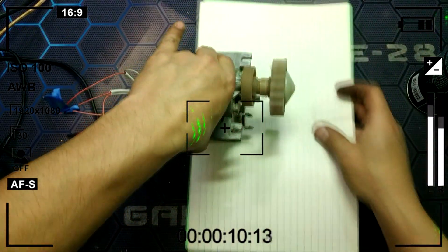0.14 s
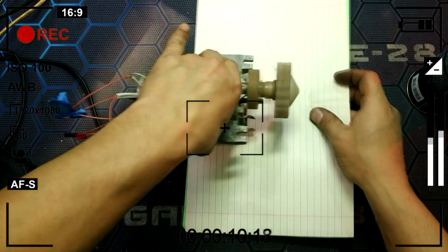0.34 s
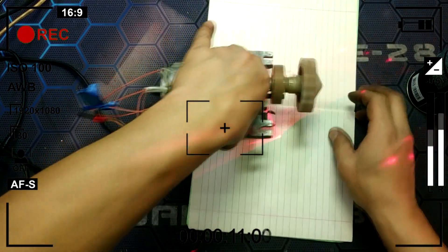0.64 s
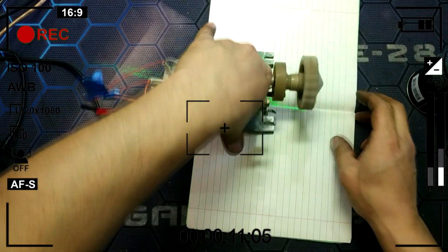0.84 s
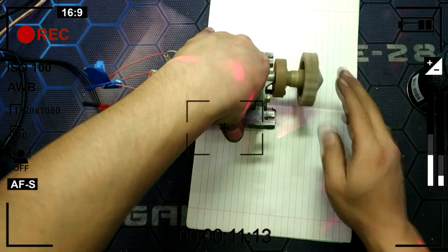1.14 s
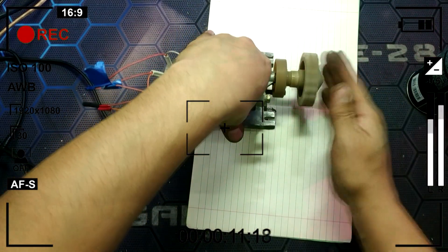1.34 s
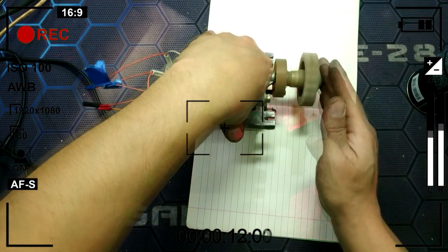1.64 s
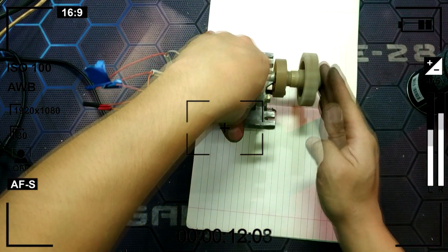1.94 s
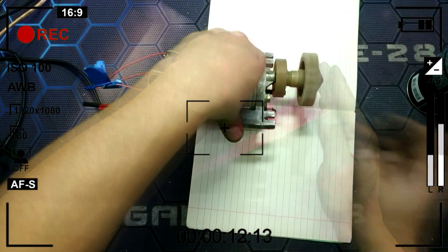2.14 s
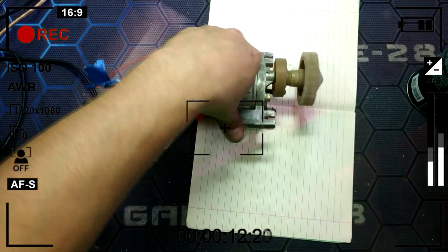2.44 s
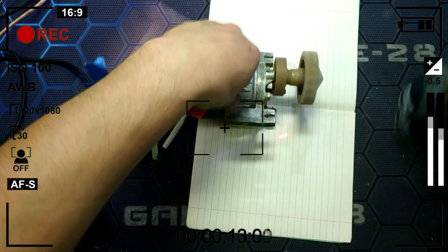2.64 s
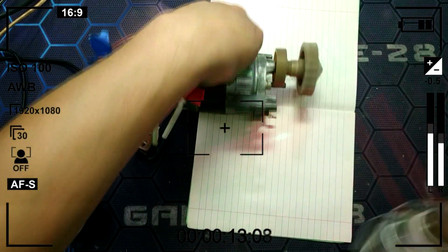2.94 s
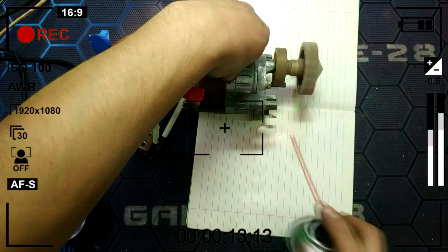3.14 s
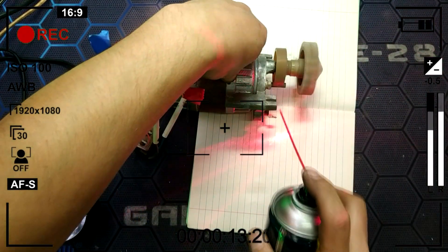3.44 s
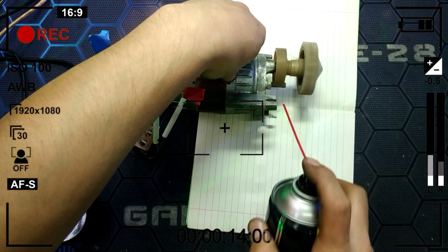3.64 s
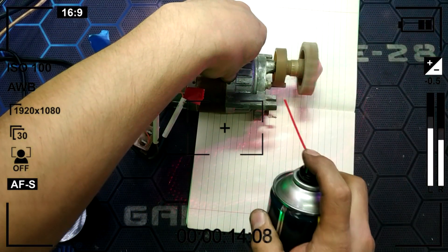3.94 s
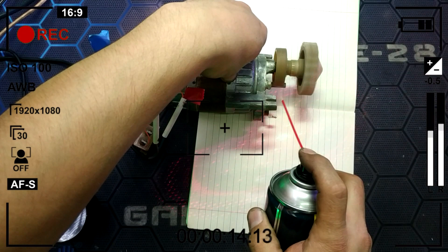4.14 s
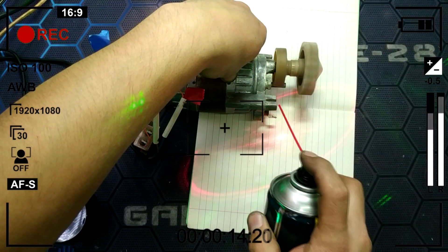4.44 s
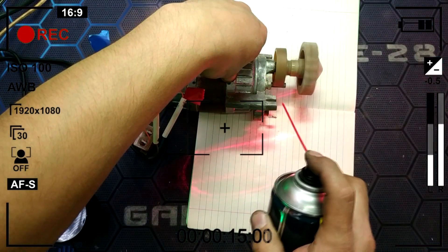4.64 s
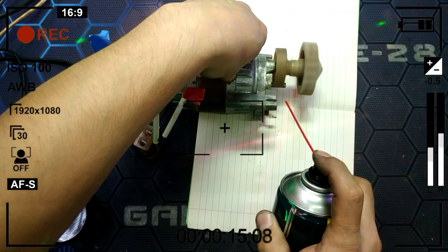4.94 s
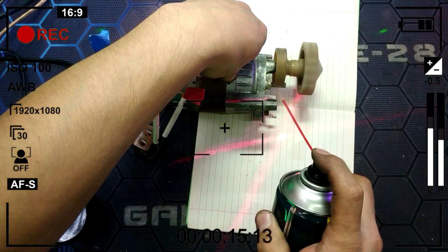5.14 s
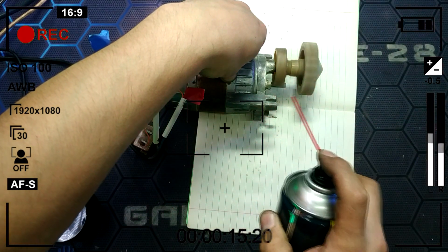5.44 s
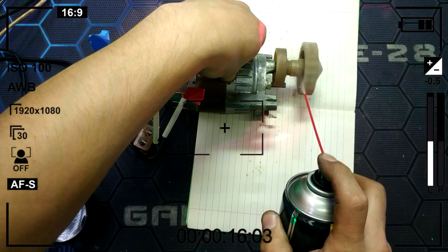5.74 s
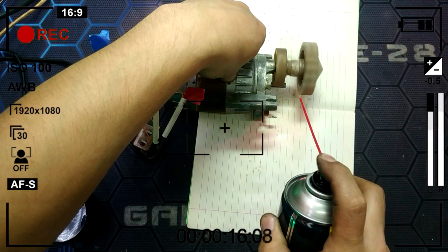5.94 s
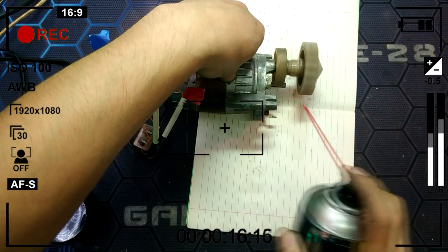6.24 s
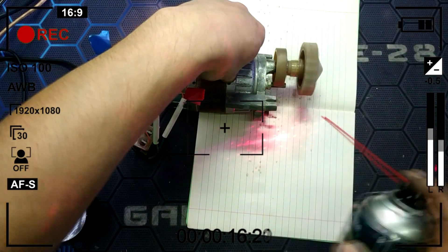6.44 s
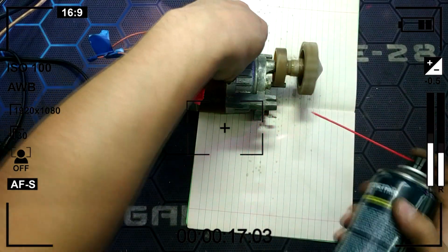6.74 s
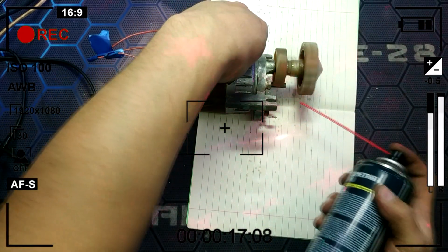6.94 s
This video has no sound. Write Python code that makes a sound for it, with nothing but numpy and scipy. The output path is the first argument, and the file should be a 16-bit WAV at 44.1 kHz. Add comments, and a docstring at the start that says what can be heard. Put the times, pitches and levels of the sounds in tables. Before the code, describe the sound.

Gritty, fast-throbbing metal grinding from a little motor, dropping to faint whine and light grazes once, then returning almost steadily to the end.

```python
"""On a desk top in a room: a small electric motor, held down on a notepad, turns a knob on a dry shaft.
About ten turns a second grind in the metal casing: random grit rings resonances, its force set over time.
The grind falters and drops out, baring light grazes, a thin whine, faint singing notes and filtered hiss.
The desk rumbles along as noise in low resonances and is knocked twice, as decaying sines.
One microphone without bass; distance lies in the levels alone, and both channels are the same."""
import sys
import numpy as np
from scipy import signal
from scipy.fft import rfft, irfft
from scipy.io import wavfile

SR = 44100
rng = np.random.default_rng(int(sys.argv[2]) if len(sys.argv) > 2 else 0)


def store_pcm(level_fs):
    """Save levels as 16-bit WAV."""
    pcm = np.round(np.clip(level_fs, -1, 1) * 32767).astype(np.int16)
    wavfile.write(sys.argv[1], SR, np.atleast_2d(pcm).T)


N = 312228

# Grind in full contact: t/s, level/dB, share of the dull part/dB, share of the top/dB
GRIND = [(0, -22, -0.5, 1.5), (.5, -21, -1.5, 0.5), (1.1, -22.5, -0.5, 2.5), (1.4, -23.5, -1, -2),
         (2.0, -28.5, 3, -11), (2.07, -23.5, -1.5, 1.5), (2.15, -23.5, -1, 0), (2.3, -22.5, 0, 0.5),
         (2.9, -22.5, -1.5, -1), (3.8, -22, -1, -2.5), (4.3, -22.5, 0, 1), (4.8, -22, -0.5, -1),
         (5.7, -21.5, -1, -2), (6.5, -22, -0.5, -1.5), (6.8, -22.5, 0, -0.5), (7.08, -23, 1, -1.5)]
# The grind slackens (negative depth: it bears harder): t/s, depth/dB, length/s
FALTERS = [(.473, 2.5, 0.066), (.686, 5.5, 0.014), (1.3, -1, .02), (2.223, 1.5, 0.033), (2.66, 1.5, 0.056),
           (3.253, 2, 0.038), (3.475, 3, 0.027), (3.67, 1.5, 0.038), (3.828, 6, 0.068), (4.005, 2, 0.063),
           (4.099, 4, 0.071), (4.146, 1.5, .03), (4.285, 0.5, 0.023), (4.598, 1.5, 0.12),
           (5.118, 2.5, 0.055), (5.317, 2.5, 0.031), (5.46, 5.5, 0.039), (5.532, 1.5, 0.054),
           (5.94, 1, 0.031), (6.432, 1.5, .057), (6.746, 4.5, 0.033), (7.02, 1.5, 0.024)]
# Contact is lost: lets go t/s, bites again t/s, first drop/dB, fade/(dB/s), return/(dB/s), weaker on return/dB
DROPOUTS = [(1.414, 2.011, 4, 350, 1800, 2.5), (4.2, 4.262, 5.5, 225, 3000, 3.5),
            (6.826, 6.975, 2.5, 310, 520, 1.5)]
# The free shaft grazes about once a turn:
# t/s, level/dB, rise time of 10 dB/s, fade/(dB/s), share of the dull part/dB
GRAZES = [(1.505, -40, .035, 300, 13), (1.5575, -33, 0.003, 520, 12), (1.577, -36.5, .006, 480, 6),
          (1.672, -43.5, .025, 300, 14), (1.765, -42, .022, 300, 15), (1.858, -49, .025, 260, 16),
          (1.968, -42, .012, 350, 13), (6.927, -46, .012, 500, 5)]
# A light touch rings the casing less: f/Hz, relative level/dB
GRAZE_COLOUR = [(2000, -16), (3000, -3), (4000, -6), (5000, -3), (5350, -3), (5800, -3), (6500, -5),
                (7200, -5), (9000, -7), (15700, -8)]
# Casing resonances: f/Hz, width/Hz, relative level/dB
CASING = [(739, 38, -16.5), (1157, 29, -10.5), (1535, 62, -9), (1766, 63, -14), (2125, 18, -12),
          (2460, 80, -9.5), (2605, 34, -5.5), (2762, 26, -2), (2974, 38, -5), (3332, 37, -3.5),
          (3530, 37, -3.5), (3705, 91, -2), (4404, 79, -2), (4592, 45, 3), (4700, 66, 4.5), (4844, 58, 0),
          (4970, 59, 2.5), (5192, 68, 2.5), (5260, 60, -3), (5340, 72, -1.5), (5480, 58, -6),
          (6320, 270, -11.5), (7430, 220, -8), (8020, 220, -6.5), (8280, 78, -7.5), (9030, 170, -9),
          (10810, 640, -9.5), (11040, 150, -11), (11520, 480, -9.5), (13400, 270, -8), (14100, 120, -10)]
# Broad part of the grind: f/Hz, relative level per Hz/dB
RUB = [(290, -34), (500, -16.5), (828, -15.5), (1280, -15.5), (2600, -8), (3150, -8), (3660, -6.5),
       (4100, -8), (5020, -1), (5970, -5), (8000, -7), (9500, -9.5), (12500, -10), (15700, -12.5)]
# Where the casing radiates badly (one row lifts instead): f/Hz, width/Hz, depth before scaling/dB
VALLEYS = [(1080, 95, -3), (2240, 78, -12), (1650, 71, -6), (3054, 80, -6), (3250, 90, -7), (3870, 36, -5),
           (4100, 110, -6), (4790, 46, -10), (6030, 130, -4.5), (6500, 200, -12.5), (8040, 100, -5),
           (8400, 240, -2), (9400, 150, 1), (9400, 350, -9)]
# A band that the holding hand damps as it presses down: t/s, lift before scaling/dB
LOOSE_LIFT = [(0, 8.5), (1.0, 5), (1.4, 6), (2.1, 2), (4, 0.5), (5.5, 3.5), (7.08, 0.5)]
# The blows on the desk: t/s, strength/dB, lowest mode/dB, upper modes/dB, rise time constant/s
KNOCKS = [(3.151, -21, 0, -9, 0.0024), (3.175, -31, -4, -5, .002), (3.411, -21.5, -5, 2, 0.00049),
          (3.421, -26, -8, 2.5, 0.0013), (3.429, -26, -7, 1, .001), (3.4439, -30, -1, 5, 0.0011)]
# Modes of the knocked desk: f/Hz, relative level/dB, time to fall 60 dB/s
KNOCK_MODES = [(227, 3.5, 0.075), (262, -7, 0.12), (420, -0.5, 0.079), (540, -12, 0.12), (742, -2.5, 0.034),
               (900, -6, 0.025)]
# Desk shaken by the motor: t/s, level/dB, share of the low modes/dB
RUMBLE = [(0, -49.5, -14), (1.0, -51, -3), (1.35, -54, 14.5), (1.6, -43.5, 14.5), (1.75, -29, -10),
          (1.95, -40, 13), (2.03, -48, 5), (2.15, -40.5, -1), (2.35, -44, -8), (2.6, -47, -22),
          (3.1, -37, -8.5), (3.8, -39.5, 0.5), (4.2, -43.5, 8.5), (5.0, -39, -3), (5.5, -38.5, 2),
          (6.3, -40, -11), (6.7, -40.5, 5.5), (6.8, -41, 3.5), (7.08, -48.5, 15.5)]
# Desk resonances: f/Hz, width/Hz, relative level/dB
DESK = [(194, 43, -27), (230, 71, -23.5), (273.7, 27, -7.5), (310, 15.6, -0.5), (356.4, 25.6, 4.5),
        (430.5, 33, 1), (510.5, 19, -4)]
# Upper winding whine: t/s, level/dB
WHINE = [(0, -56.5), (1.5, -49.5), (1.77, -42.5), (1.93, -49.5), (2.09, -44.5), (2.21, -46), (2.34, -56),
         (2.5, -50.5), (4.67, -51), (5.6, -50), (6.58, -54.5), (6.96, -50), (7.08, -51)]
# Pitch of the upper whine: t/s, f/Hz
WHINE_HZ = [(0, 846.7), (1.45, 846.7), (1.6, 845.7), (2.1, 845.8), (2.5, 846.6), (7.08, 846.6)]
# Lower whine: t/s, level/dB
LOWER_WHINE = [(0, -68), (.3, -54), (1.3, -57), (1.5, -54), (1.72, -51), (1.8, -65), (1.95, -59),
               (2.4, -56), (4, -64), (6.6, -57), (6.9, -54), (7.08, -56)]
# Thin notes that linger through the last drop-out: f/Hz, level/dB
SINGING = [(3355, -51), (3585, -57), (3680, -52), (4570, -63)]
# Spectrum of the room and microphone hiss: f/Hz, relative level per Hz/dB
HISS = [(60, -44), (90, -36), (125, -17), (160, -23.5), (188, -5), (225, -12), (350, -13.5), (450, 4.5),
        (560, -7.5), (650, -18), (800, -8), (1000, -12.5), (1400, -5), (2100, -11), (2800, -5),
        (3400, -9.5), (4000, -3), (5000, -14), (5350, -16), (5850, -17), (6400, -12), (7100, -9),
        (8000, -12), (8800, -9.5), (12000, -15), (13200, -15), (15700, -19)]
# The hiss over time: t/s, level/dB
HISS_LEVEL = [(0, -45.5), (1.5, -42.5), (1.8, -42.5), (2.0, -44), (4.2, -43.5), (6.8, -47.5), (7.08, -46)]
# Narrow hollows of the room at the microphone: f/Hz, width/Hz, depth/dB
HOLLOWS = [(244, 17, -8.5), (323, 6.7, -6), (485, 13, -4), (650, 20, -7), (820, 20, -7)]

TURNS_PER_S, FIRST_TURN = 9.72, 0.7   # rate; phase at the start, in turns
SCRAPE_DB = 1.6   # some turns scrape brighter than others
TOP_FOLLOWS = 0.21   # the top loses this share more when contact is weak
LIFTED_DB = -39.5   # what is left of the grind without contact
SETTLE_S, LET_GO_S = 0.032, 0.0017   # time constants: recovery after biting again; the first drop
LOOSE_HZ, LOOSE_WIDTH_HZ = 2290, 270
KNOCK_LOW_HZ = 166   # the blows have little under this
RUMBLE_FOLLOWS = 0.42   # share of the loss of contact that the desk feels
DESK_LAG_S = 0.0077   # the desk follows the contact late, with this time constant
LOWER_WHINE_HZ = 747.0
SING_S, SING_LENGTH_S = 6.87, 0.22   # middle and length of the singing
HISS_FLICKER_DB = 1.3
CUTOFF_HZ = 15710   # top of the microphone's band


def grind(slack, contact):
    """Grit rings the casing; the contact force throbs with each turn, and the top feels it most."""
    level_db, dull_db, top_db = in_time(GRIND)
    turns = FIRST_TURN + TURNS_PER_S * np.arange(N) / SR
    throb = np.cos(2 * np.pi * turns)   # the shaft runs a little off centre
    force_db = slack + 0.39 * throb + 0.36 * drift(2.35) + 0.34 * drift(100)
    scrape_db = SCRAPE_DB * np.maximum(throb, 0) * np.abs(drift(4.1))

    ringing = resonate(grit(per_s=18000, spread_db=0.2), CASING, waver_db=2.35)
    rubbing = coloured(grit(per_s=20000, spread_db=0.24), RUB)
    body = radiate(from_db(-1.5) * ringing + rubbing)
    low = lowpass_both_ways(body, 2, 2300)
    under_top = lowpass_both_ways(body, 2, 8500)

    full = from_db(level_db + contact)
    light, light_dull = grazes()
    low_gain = (full * from_db(dull_db) + light_dull) * from_db(0.56 * drift(28))
    middle_gain = full * from_db(0.66 * drift(19))
    top_share = from_db(top_db + TOP_FOLLOWS * contact)
    top_force = from_db(0.66 * force_db + 0.33 * throb + scrape_db + 1.0 * drift(24))
    top_gain = full * top_share * top_force

    dull = low_gain * low
    middle = middle_gain * (under_top - low)
    top = top_gain * (body - under_top)
    touch = light * coloured(body - low, GRAZE_COLOUR)
    return from_db(force_db) * (dull + middle + top + touch)


def slack_db():
    """Each falter is a hollow in the contact force; a negative depth is a swell."""
    return -bumps(FALTERS)


def contact_db():
    """Each drop-out falls at once, fades toward the lifted level, climbs back quickly and then settles."""
    t, out = np.arange(N) / SR, np.zeros(N)
    for off_s, on_s, drop_db, fade, rise, weaker_db in DROPOUTS:
        since = np.maximum(t - off_s, 0)
        falling_db = drop_db * (1 - np.exp(-since / LET_GO_S)) + fade * since
        returning_db = weaker_db + rise * (on_s - t)
        gap = -np.minimum(falling_db, returning_db)
        settle = -weaker_db * np.exp(-np.maximum(t - on_s, 0) / SETTLE_S)
        out += np.where(t < on_s, np.clip(gap, LIFTED_DB, 0), settle)
    return out


def grazes():
    """Gains of the light touches and of their dull part; each rises and fades at a steady dB rate."""
    t, gains = np.arange(N) / SR, []
    for s, peak_db, rise_s, fade, _ in GRAZES:
        below_peak_db = np.where(t < s, 10 * (s - t) / rise_s, fade * (t - s))
        gains.append(from_db(peak_db - below_peak_db))
    gains = np.array(gains)
    dull_shares = from_db([row[-1] for row in GRAZES])
    return gains.sum(axis=0), dull_shares @ gains


def grit(per_s, spread_db):
    """Tiny collisions of rough metal, at random moments and of uneven size."""
    sizes = from_db(spread_db * np.minimum(rng.exponential(1, N), 5)) * rng.standard_normal(N)
    return rms_one(sizes * (rng.random(N) < per_s / SR))


def radiate(x):
    """The casing cuts narrow valleys, which deepen and fill; one band follows the grip."""
    grip_band = (LOOSE_HZ, LOOSE_WIDTH_HZ, in_time(LOOSE_LIFT)[0])
    for hz, width, change_db in VALLEYS + [grip_band]:
        gain = from_db(change_db * (0.72 + 0.42 * drift(11.4)))
        x = x + (gain - 1) * resonance(x, hz, width)
    return rms_one(x)


def knocks():
    """Soft blows on the desk top: each sounds its modes as sines with a quick rise and a steady dB decay."""
    t, out = np.arange(SR // 4) / SR, np.zeros(N)
    for s, strength_db, lowest_db, upper_db, rise_s in KNOCKS:
        at = round(s * SR)
        for hz, level_db, t60 in KNOCK_MODES:
            colour_db = lowest_db * (hz < 245) + upper_db * (hz > 330)
            gain = from_db(strength_db - 2.0 + level_db + colour_db - 60 * t / t60)
            out[at:at + len(t)] += gain * (1 - np.exp(-t / rise_s)) * np.sin(2 * np.pi * hz * t)
    return signal.sosfilt(signal.butter(3, KNOCK_LOW_HZ, "high", fs=SR, output="sos"), out)


def desk(slack, contact):
    """The casing shakes the desk through the notepad: noise in a few low resonances."""
    level_db, deep_db = in_time(RUMBLE)
    lag = np.exp(-1 / (DESK_LAG_S * SR))
    felt = signal.lfilter([1 - lag], [1, -lag], contact)
    shaken = resonate(rng.standard_normal(N), DESK, waver_db=2.24)
    band = signal.butter(4, [190, 560], "band", fs=SR, output="sos")
    steep = rms_one(signal.sosfilt(band, shaken))
    deep = lowpass_both_ways(steep, 3, 320)
    gain = from_db(level_db + RUMBLE_FOLLOWS * felt + 0.38 * slack + 0.29 * drift(12.0))
    return gain * (steep - deep + from_db(deep_db) * deep)


def whine():
    """Two magnetic tones of the winding, unsteady in level and phase; the lower one wavers more."""
    upper_phase = 2 * np.pi * np.cumsum(in_time(WHINE_HZ)[0]) / SR
    upper_gain = from_db(in_time(WHINE)[0] + 0.19 * drift(3.7))
    upper = upper_gain * np.sin(upper_phase + 0.36 * drift(5.5))
    lower_phase = 2 * np.pi * LOWER_WHINE_HZ * np.arange(N) / SR
    lower_gain = from_db(in_time(LOWER_WHINE)[0] + 1.5 * drift(8))
    lower = lower_gain * np.sin(lower_phase + 1.2 * drift(3.1))
    return np.sqrt(2) * (upper + lower)   # a sine of rms 1 peaks at the root of 2


def singing():
    """The casing sings faintly, in wavering sines, while the shaft runs nearly free."""
    t, notes = np.arange(N) / SR, np.zeros(N)
    for hz, level_db in SINGING:
        notes += from_db(level_db + 3 * drift(12)) * np.sin(2 * np.pi * hz * t + 1.5 * drift(10.5))
    return np.sqrt(2) * bumps([(SING_S, 1, SING_LENGTH_S)]) * notes


def room_hiss():
    """Room and microphone hiss: coloured noise that flickers in level."""
    gain = from_db(in_time(HISS_LEVEL)[0] + HISS_FLICKER_DB * drift(12))
    return gain * coloured(rng.standard_normal(N), HISS)


def room(x):
    """Standing waves leave a few narrow hollows in the lower range at the microphone."""
    for hz, width, depth_db in HOLLOWS:
        x = x + (from_db(depth_db) - 1) * resonance(x, hz, width)
    return x


def resonate(x, modes, waver_db):
    """Parallel resonances, signs alternating, each swelling and fading on its own; rms 1."""
    out = np.zeros(N)
    for k, (hz, width, level_db) in enumerate(modes):
        out += (-1) ** k * from_db(level_db + waver_db * drift(6.2)) * resonance(x, hz, width)
    return rms_one(out)


def resonance(x, hz, width):
    """One two-pole resonance, gain 1 on top."""
    r = np.exp(-np.pi * width / SR)
    poles = [1, -2 * r * np.cos(2 * np.pi * hz / SR), r * r]
    return signal.lfilter([(1 - r * r) / 2, 0, (r * r - 1) / 2], poles, x)


def coloured(x, spectrum):
    """x through a spectrum of (f/Hz, level/dB) points, joined over log frequency; rms 1."""
    hz, level_db = np.transpose(spectrum)
    grid = np.maximum(np.fft.rfftfreq(N, 1 / SR), 1)
    gain = from_db(np.interp(np.log(grid), np.log(hz), level_db))
    return rms_one(irfft(rfft(x) * gain, N))


def lowpass_both_ways(x, order, hz):
    """Low-pass run forward and backward, so that the bands split without delay."""
    return signal.sosfiltfilt(signal.butter(order, hz, fs=SR, output="sos"), x)


def bumps(rows):
    """Sum of smooth Gaussian bumps of (t/s, height, length/s)."""
    t, heights = np.arange(0, N + 64, 64) / SR, 0   # worked out every 64 samples
    for s, height, length in rows:
        heights = heights + height * np.exp(-(2.9 * (t - s) / length) ** 2)
    return np.interp(np.arange(N) / SR, t, heights)


def drift(rate):
    """Slow chance of rms 1: noise through two equal low-pass poles at rate (Hz)."""
    r = np.exp(-2 * np.pi * rate * 40 / SR)   # worked out every 40 samples
    noise = rng.standard_normal(N // 40 + 2002)
    slow = signal.lfilter([1], [1, -2 * r, r * r], noise)[2000:]   # without the run-in
    return np.interp(np.arange(N) / 40, np.arange(len(slow)), rms_one(slow))


def in_time(rows):
    """Columns of (t/s, ..) rows, one value per sample."""
    s, *columns = np.transpose(rows)
    return [np.interp(np.arange(N) / SR, s, c) for c in columns]


def from_db(db):
    """Decibels to gain."""
    return 10 ** (np.asarray(db) / 20)


def rms_one(x):
    """x scaled to rms 1."""
    return x / np.sqrt(np.mean(x ** 2) + 1e-20)


def scene():
    """Motor, desk and room reach one microphone; the hollows act on grind, rumble and hiss only."""
    slack, contact = slack_db(), contact_db()
    mono = room(grind(slack, contact) + desk(slack, contact) + room_hiss())
    mono = mono + knocks() + whine() + singing()
    return np.array([mono, mono])


def record(dry):
    """The microphone rounds the peaks, drops the bass and cuts the top steeply."""
    rounded = 0.58 * np.tanh(dry / 0.62)
    thin = signal.sosfilt(signal.butter(3, 170, "high", fs=SR, output="sos"), rounded)
    return signal.sosfilt(signal.ellip(14, 0.3, 70, CUTOFF_HZ, fs=SR, output="sos"), thin)


dry = scene()
out = record(dry)
store_pcm(out)
```